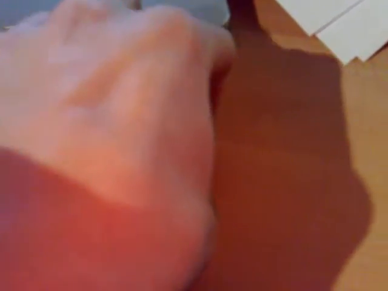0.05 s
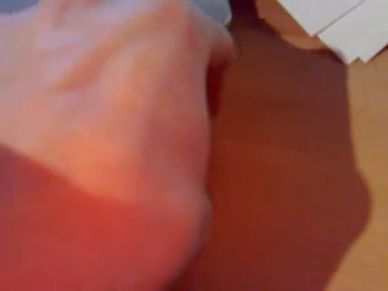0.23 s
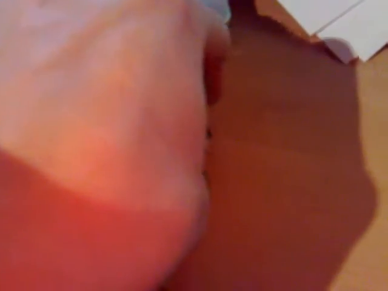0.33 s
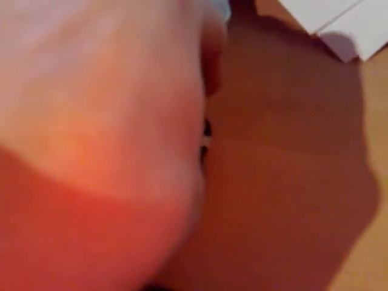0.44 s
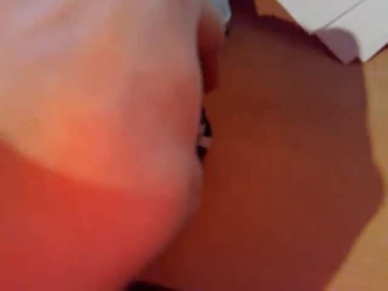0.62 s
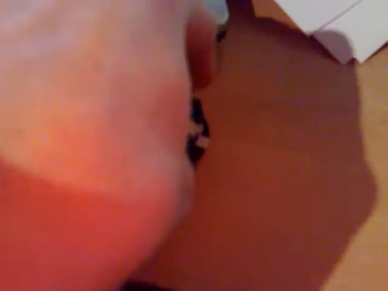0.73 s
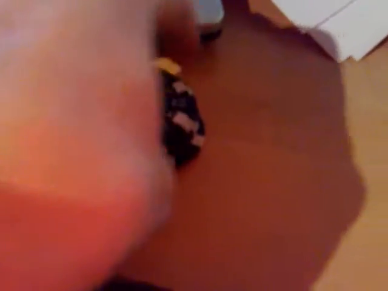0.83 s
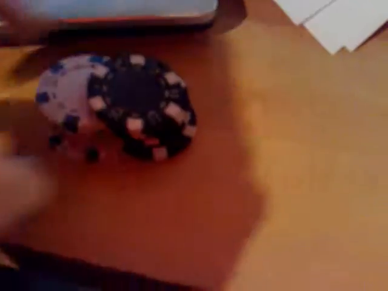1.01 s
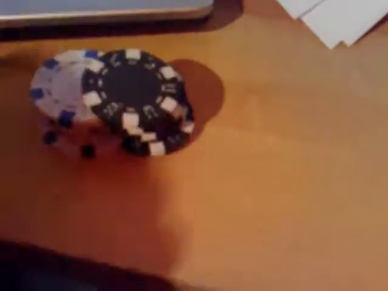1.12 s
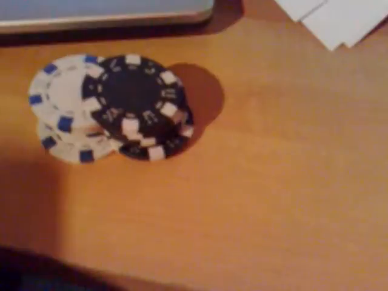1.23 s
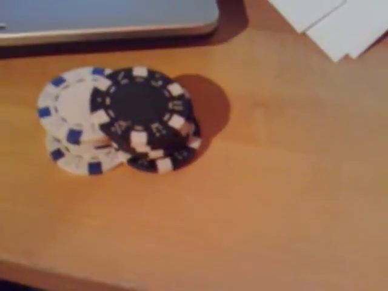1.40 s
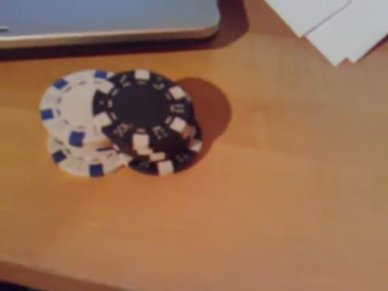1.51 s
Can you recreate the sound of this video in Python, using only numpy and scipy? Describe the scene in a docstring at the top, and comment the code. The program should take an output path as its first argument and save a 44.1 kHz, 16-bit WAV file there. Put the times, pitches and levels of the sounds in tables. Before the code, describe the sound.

Poker chips clack and rattle in a fast, bright burst as a hand drops them on a wooden desk, then a few faint touches follow; small quiet room with low hum, close small microphone.

```python
"""In a quiet room, hard plastic chips are riffled and dropped into a heap on a wooden desk, close to a small microphone.
Modal synthesis: each clack excites decaying modes of the discs and of the heap and desk top, plus a noise crack.
Fingers and a loose chip touch softly before and after: dull noise puffs, loose-disc modes, low desk modes.
Reverberation is band-wise decaying noise; room hum is filtered noise with narrow and broad resonances.
The recorder turns its gain down on the loud clatter, so the hum sinks and creeps back."""
import sys
import numpy as np
from scipy import signal
from scipy.io import wavfile
from scipy.ndimage import uniform_filter1d

SR = 44100
rng = np.random.default_rng(int(sys.argv[2]) if len(sys.argv) > 2 else 0)


def gain_from_db(level_db):
    """Convert decibel levels to linear amplitude factors (20 dB per decade)."""
    decades = np.asarray(level_db, float) / 20
    return 10 ** decades


def to_wav(s):
    """Save 16-bit WAV."""
    ch = np.atleast_2d(s).T  # columns
    pcm = np.round(np.clip(ch, -1, 1) * 32767)  # PCM
    wavfile.write(sys.argv[1], SR, pcm.astype(np.int16))


N = 68355  # length [samples]

# Spectrum of room air and electronics, overall level set later: (frequency [Hz], relative density [dB per Hz])
HUM_SPECTRUM = [(15, -35), (25, -14.5), (54, -5.5), (74, -18.5), (109, -3.5), (204, -9), (247, -2.5),
                (284, -22.5), (343, -8.5), (393, -30), (737, -8), (845, -19), (2260, -27.5), (5260, -44.5),
                (17000, -37.5)]
# Resonances of the hum, narrow and broad, with the desk and microphone colouring it near 2 kHz:
# (frequency [Hz], bandwidth [Hz], level against the broad hum [dB])
HUM_RESONANCES = [(120, 35, -9.5), (240, 30, -4), (323, 35, -13.5), (753, 25, -8), (2000, 550, -13),
                  (2400, 450, -13.5)]
HUM_DB, HUM_FLICKER_DB = -49.5, 2  # rms of the broad hum; standard deviation of each band's flicker

# Reverberation time of the room: (frequency [Hz], time to fall 60 dB [s])
ROOM_T60 = [(100, .2), (260, 0.36), (700, .25), (1840, 0.26), (4850, .16), (8000, 0.14), (12800, .11)]
# Colour of the reflections, overall level set later: (frequency [Hz], relative level [dB])
ROOM_COLOUR = [(100, -1.5), (400, 0), (1000, -4.5), (2000, -3.9), (4000, -1.5), (6500, -3), (9000, -2.5),
               (16000, -3)]
ROOM_DB, ROOM_DELAY_S = -6, .003  # energy of the room response; gap before it

# In the mode tables, struck() detunes the modes, scatters their levels and limits their decay times.
# Low modes of the desk: (frequency [Hz], level [dB], decay time t60 [s])
DESK_MODES = [(113, -4.5, 0.059), (126.8, -3, 0.078), (190, -2.5, 0.094), (235, -3, .06), (345, -5, 0.06),
              (434.4, -10, 0.046)]
# Low body of the heap and the desk top under it: (frequency [Hz], level [dB], decay time t60 [s])
BODY_MODES = [(587, -23, 0.014), (797, -18, 0.027), (938, -17.5, 0.026), (1149, -7.5, .018),
              (1374, -13, 0.02), (1580, -8.5, 0.016), (1820, -4.5, 0.016), (2113, -4.5, .022),
              (2217, -2.5, .02), (2403, -2, 0.018), (2542, -1, 0.013), (2875, -6.5, .015),
              (3310, -11.5, 0.018)]
# A single disc lying free: (frequency [Hz], level [dB], decay time t60 [s])
LOOSE_DISC_MODES = [(3012, -6.5, .008), (4094, -5.5, 0.035), (5180, -0.5, 0.017), (5913, -7, 0.025),
                    (6730, -2, 0.016)]
# Disc modes when the main ring is at RING_HZ: (frequency [Hz], level [dB], decay time t60 [s])
DISC_MODES = [(3600, -13, .012), (4026, -17, 0.031), (4736, -11.5, .012), (5370, -7.5, 0.017),
              (5820, -9.5, 0.016), (6240, -11.5, 0.017), (6678, -4, 0.025), (6730, -10, 0.0076),
              (13730, -14, 0.024)]
# Treble modes of the discs: (frequency [Hz], level [dB], decay time t60 [s])
SHEEN_MODES = [(8630, -10, 0.002), (9225, -3, 0.0095), (10000, -3.5, 0.0084), (10620, 2.5, 0.011),
               (11300, -2, 0.0064), (11760, -7.5, 0.004), (13000, -8.5, 0.0085), (13510, -8, 0.022),
               (14700, -7, 0.018), (15600, -11, 0.0052)]
RING_HZ = 6700
SCATTER_DB, DETUNE = 2.5, .008  # standard deviations from blow to blow: level, fraction of frequency
LONGEST_RING_S, LONGEST_THUMP_S = .03, .1  # upper limits of t60
DISC_RISE_S, BODY_RISE_S, THUMP_RISE_S, TOUCH_RISE_S = .00055, .0012, .0022, .002  # time constants

# Soft touches, levels before the trims below; the last three are relative to the peak:
# (time [s], peak level [dB], chip ring [dB], desk thump [dB], dull puff [dB])
TOUCHES = [(0.126, -43.5, -14.5, -17, -16), (0.131, -27.5, -48.5, -35, -16.5),
           (0.142, -44.5, -22, -32, -15), (0.173, -40.5, -22, -19.5, -19), (0.801, -32, -18, -16, -20),
           (0.867, -48, -6.5, -6, -14), (0.909, -35.5, -27, -51, -1), (0.92, -36, -20, -4, -22),
           (0.933, -24, -20, -19, -21.5), (0.949, -37, -14.5, -22, -12), (0.963, -39, -28, -10, -9.5),
           (1.348, -31.5, -33.5, -4, -9), (1.361, -36, -20, -11, -15.5), (1.385, -52.5, -22, -1, -12.5),
           (1.47, -51.5, -16.5, -7.5, -11), (1.515, -45.5, -26, -10, -10.5), (1.528, -42, -26.5, -11, -8.5)]
TOUCH_BODY_DB, TOUCH_RING_DB, TOUCH_THUMP_DB, TOUCH_PUFF_DB = -9, -3.5, -1.5, 12.5  # trims
PUFF_CUT_HZ, PUFF_T60_S = 1410, .035

# The heap knocks the desk: (time [s], level [dB])
KNOCKS = [(0.232, -24.5), (0.371, -43.5), (0.419, -36), (.436, -34.5), (.465, -32), (0.538, -37),
          (.580, -26.5), (.612, -34), (0.689, -34.5)]

# Chip on chip, levels before the trims below; the last two are relative to the ring:
# (time [s], main ring level [dB], main ring frequency [Hz], low body level [dB], sheen level [dB])
CLACKS = [(0.231, 2, 6317, 0.5, 4), (0.2385, 1.5, 6470, -2, -10), (0.2425, -10.5, 6600, 1, -2),
          (0.2524, -16, 6110, -1.5, -3), (0.2637, -3.5, 6445, -0.5, -6.5), (0.268, -13, 6330, 1, -11),
          (0.3706, -24, 7060, 14, -6.5), (0.395, -42, 5570, 21.5, -16), (0.4169, 1, 6570, 7, 5),
          (0.421, -3, 7010, 4.5, 0.5), (0.425, -14.5, 6695, 17.5, -2.5), (0.429, -17, 6600, -4.5, -10.5),
          (0.4414, -1, 6730, -8, -5.5), (0.4525, -1.5, 6960, 5, -0.5), (0.456, -2.5, 7340, 7, -3),
          (0.459, -10, 6740, -3.5, 2.5), (0.462, 3.5, 6700, -2, 2.5), (0.4668, 2.5, 6715, -8, -2.5),
          (0.471, 1.5, 6550, -13, 2), (0.477, -9.5, 6670, 0, -2), (0.477, -4.5, 6420, -13.5, -7.5),
          (0.491, -7, 6270, -1, -1.5), (0.499, -12, 6340, -4.5, -8.5), (0.505, -16.5, 6610, 8, -9.5),
          (0.515, -11.5, 6910, 3, -1), (0.5377, -7.5, 6660, 8.5, 0), (0.547, -13.5, 6560, 7.5, -9.5),
          (0.568, -7.5, 6860, -1, -1), (0.575, 1.5, 6896, 0, -6.5), (0.586, -6, 6420, -15.5, -3),
          (0.595, 0, 6870, 1.5, -1), (0.599, 2, 6615, -15.5, 0), (0.608, -6.5, 6550, 0, -2.5),
          (0.6129, 3, 6403, -8, -9.5), (0.619, -3, 6620, -18, 2), (0.623, 2.5, 6590, -9, 4),
          (0.628, -2, 6870, -7.5, 1.5), (0.633, -6, 6650, -7, -3.5), (0.641, -5.5, 5560, -20, -1.5),
          (0.6435, -2.5, 5650, -4, -7), (0.648, -25, 5700, 7, -13)]
DISC_DB, SHEEN_DB, BODY_DB, CRACK_DB = -2.5, -9, -4.5, -13  # trims
CRACK_T60_S, CONTACT_LAG_S = .006, .00046  # the main contact follows the listed time by this lag
SHEEN_SPREAD = .02  # each blow's treble modes sit a little differently: fraction of frequency
RATTLE_PER_CLACK, RATTLE_WITHIN_S, RATTLE_DB = 3, .012, -15  # fainter extra contacts

MAKEUP_DB = 16.5  # gain of the chips and their room, not of the hum
KNEE_DB, SQUEEZE = -24.5, .44  # gain control: threshold; share of the excess dB removed
RECOVER_DB_PER_S, GRAB_S = 12, .009  # recovery rate; smoothing time constant of the gain
TOP = .9  # amplitude that rounded peaks approach
CUTOFF_HZ, MIC_LOW_HZ = 17200, 65


def at_hz(points, hz):
    """Linear interpolation of a table on a log-frequency axis."""
    table = np.array(points)
    return np.interp(np.log(hz), np.log(table[:, 0]), table[:, 1])


def rms_one(x):
    """Normalisation to unit root-mean-square."""
    return x / np.sqrt(np.mean(x ** 2) + 1e-20)


def add(out, s, sound):
    """Superposition: mix a sound in at a time in seconds."""
    i = int(s * SR)
    out[i:i + len(sound)] += sound[:N - i]


def bands():
    """Filter-bank analysis: half-octave band-passes with their centres, the last reaching 0.45 SR."""
    edges = np.append(22 * 2 ** np.arange(0, 10, .5), .45 * SR)
    return [(np.sqrt(low * high), signal.butter(2, [low, high], "band", fs=SR, output="sos"))
            for low, high in zip(edges, edges[1:])]


def hum():
    """Filtered noise: bands flicker around a steady spectrum; two-pole filters add the resonances."""
    white = rng.standard_normal((3, N + SR))
    broad = 0
    knots = np.arange(0, N + 3000, 3000)
    for k, (hz, sos) in enumerate(bands()):
        flicker = np.interp(np.arange(N), knots, rng.standard_normal(N // 3000 + 2))
        band = signal.sosfilt(sos, white[k % 2])[SR:]  # the filter settles in the first second
        broad = broad + band * gain_from_db(at_hz(HUM_SPECTRUM, hz) + HUM_FLICKER_DB * flicker)
    out = rms_one(broad)
    for hz, width_hz, db in HUM_RESONANCES:
        radius = np.exp(-np.pi * width_hz / SR)
        poles = [1, -2 * radius * np.cos(2 * np.pi * hz / SR), radius * radius]
        resonance = signal.lfilter([1, 0, -1], poles, white[2])[SR:]
        out = out + gain_from_db(db) * rms_one(resonance)
    return gain_from_db(HUM_DB) * out


def room(x):
    """Diffuse reverberation: convolution with noise that decays band by band after a short gap."""
    t = np.arange(SR // 2) / SR
    white = rng.standard_normal((2, SR // 2))
    tail = 0
    for k, (hz, sos) in enumerate(bands()):
        decay_db = at_hz(ROOM_COLOUR, hz) - 60 * t / at_hz(ROOM_T60, hz)
        tail = tail + signal.sosfilt(sos, white[k % 2]) * gain_from_db(decay_db)
    tail = tail * np.clip(t / ROOM_DELAY_S - 1, 0, 1)  # silent gap, then an equally long fade-in
    response = gain_from_db(ROOM_DB) * tail / np.sqrt(np.sum(tail ** 2))
    return signal.fftconvolve(x, response)[:N]


def struck(modes, db, tune=1, rise_s=1e-4, longest_s=LONGEST_RING_S):
    """Modal superposition: a blow is a sum of decaying sines, each with chance strength and tuning."""
    hz, level_db, t60 = np.transpose(modes)[:, :, None]
    t = np.arange(SR // 8) / SR
    level_luck, pitch_luck = rng.standard_normal((2, len(modes), 1))
    decay_db = 60 * t / np.clip(t60, .004, longest_s)
    gain = gain_from_db(db + level_db + SCATTER_DB * level_luck - decay_db)
    mode_hz = hz * tune * (1 + DETUNE * pitch_luck)
    ring = (gain * np.sin(2 * np.pi * mode_hz * t)).sum(0)
    return ring * (1 - np.exp(-t / rise_s))


def thump(db):
    """Low-frequency plate resonance: the desk's low modes, slow to start."""
    return struck(DESK_MODES, db, rise_s=THUMP_RISE_S, longest_s=LONGEST_THUMP_S)


def puff(db):
    """Band-limited noise under a rising and decaying envelope: the dull part of a soft contact."""
    t = np.arange(SR // 16) / SR
    envelope = gain_from_db(db - 60 * t / PUFF_T60_S) * (1 - np.exp(-t / TOUCH_RISE_S))
    sos = signal.butter(2, [400, PUFF_CUT_HZ], "band", fs=SR, output="sos")
    return signal.sosfilt(sos, envelope * rng.standard_normal(len(t)))


def touches():
    """Soft contact: a slow rise on the body modes, with loose-disc ring, desk thump and dull puff."""
    out = np.zeros(N)
    for s, db, ring_db, thump_db, puff_db in TOUCHES:
        add(out, s, struck(BODY_MODES, db + TOUCH_BODY_DB, rise_s=TOUCH_RISE_S))
        add(out, s, struck(LOOSE_DISC_MODES, db + ring_db + TOUCH_RING_DB, rise_s=DISC_RISE_S))
        add(out, s, thump(db + thump_db + TOUCH_THUMP_DB))
        add(out, s, puff(db + puff_db + TOUCH_PUFF_DB))
    return out


def knocks():
    """Impact excitation of the desk: the heap sets off its low modes."""
    out = np.zeros(N)
    for s, db in KNOCKS:
        add(out, s, thump(db))
    return out


def crack(db):
    """Broadband impact noise: white noise with an exponential decay."""
    t = np.arange(SR // 50) / SR
    return gain_from_db(db + CRACK_DB - 60 * t / CRACK_T60_S) * rng.standard_normal(len(t))


def clacks():
    """Repeated impact: a main contact and fainter ones excite disc and body modes and a crack."""
    out = np.zeros(N)
    for s, db, hz, body_db, sheen_db in CLACKS:
        later = rng.random(RATTLE_PER_CLACK) * RATTLE_WITHIN_S
        contacts = [(CONTACT_LAG_S, db)] + [(lag, db + RATTLE_DB) for lag in later]
        for lag, blow_db in contacts:
            sheen_tune = 1 + SHEEN_SPREAD * rng.standard_normal()
            add(out, s + lag, struck(BODY_MODES, blow_db + body_db + BODY_DB, rise_s=BODY_RISE_S))
            add(out, s + lag, struck(DISC_MODES, blow_db + DISC_DB, hz / RING_HZ, rise_s=DISC_RISE_S))
            add(out, s + lag, struck(SHEEN_MODES, blow_db + sheen_db + SHEEN_DB, sheen_tune))
            add(out, s + lag, crack(blow_db))
    return out


def scene():
    """Superposition of direct sound, its reverberation and the background hum."""
    near = clacks() + knocks() + touches()
    return (gain_from_db(MAKEUP_DB) * (near + room(near)) + hum())[None]


def gain_control(x):
    """Dynamic range compression: level above a knee lowers the gain, which recovers slowly."""
    t = np.arange(N) / SR
    level_db = 10 * np.log10(uniform_filter1d(x[0] ** 2, 441) + 1e-12)  # 10 ms mean power
    over_db = SQUEEZE * np.maximum(level_db - KNEE_DB, 0)
    # the largest reduction so far, released at a constant rate
    recovered_db = RECOVER_DB_PER_S * t
    held_db = np.maximum(np.maximum.accumulate(over_db + recovered_db) - recovered_db, 0)
    r = np.exp(-1 / (GRAB_S * SR))
    return x * gain_from_db(-signal.lfilter([1 - r], [1, -r], held_db))


def top_cut(x):
    """Nothing passes above the cut-off."""
    return signal.sosfilt(signal.butter(12, 17230, fs=SR, output="sos"), x)


def record(dry):
    """Recording chain: gain control, saturation of the peaks, then low-pass and high-pass filters."""
    rounded = TOP * np.tanh(gain_control(dry) / TOP)
    low_pass = signal.cheby2(10, 60, CUTOFF_HZ, fs=SR, output="sos")
    high_pass = signal.butter(2, MIC_LOW_HZ, "high", fs=SR, output="sos")
    mix = signal.sosfilt(high_pass, signal.sosfilt(low_pass, rounded))
    return top_cut(mix)


dry = scene()
out = record(dry)
to_wav(out)
```